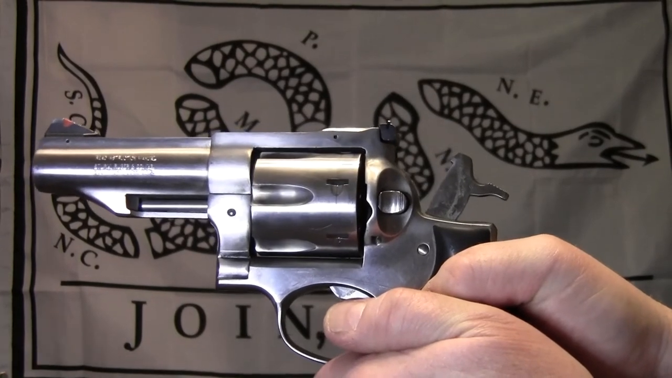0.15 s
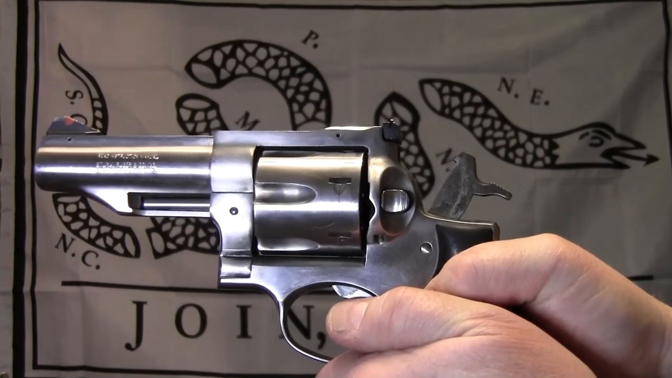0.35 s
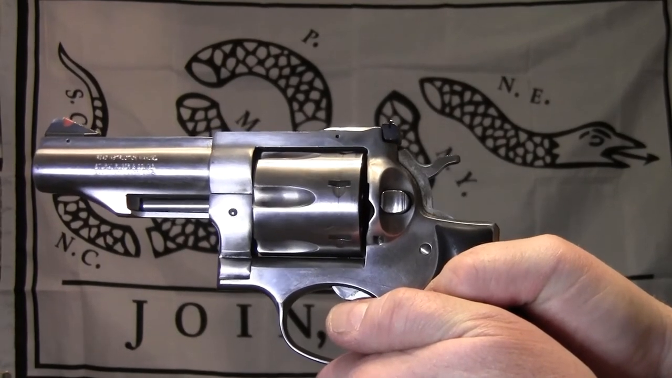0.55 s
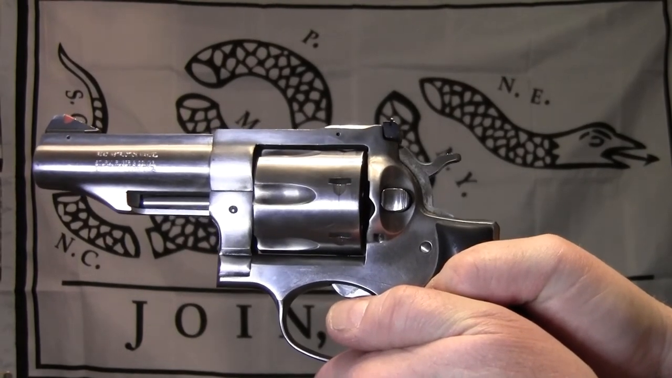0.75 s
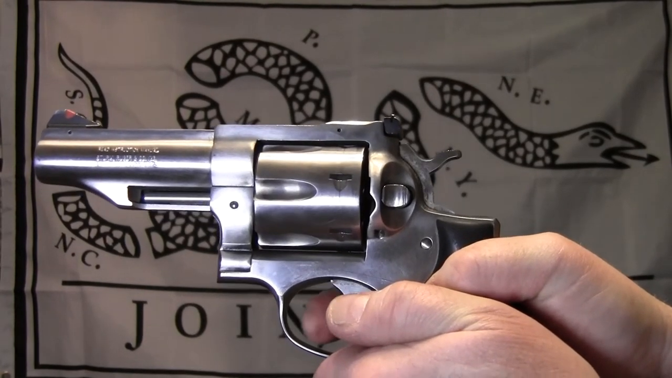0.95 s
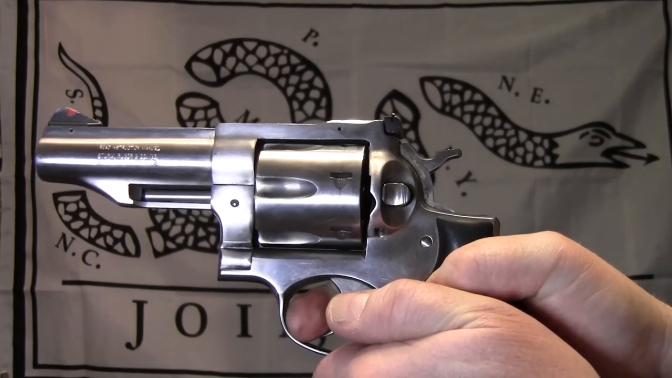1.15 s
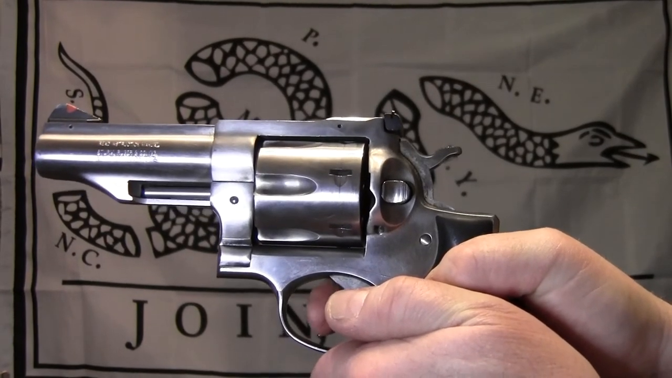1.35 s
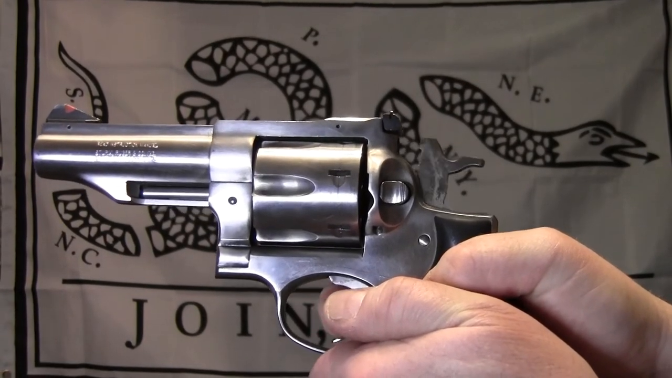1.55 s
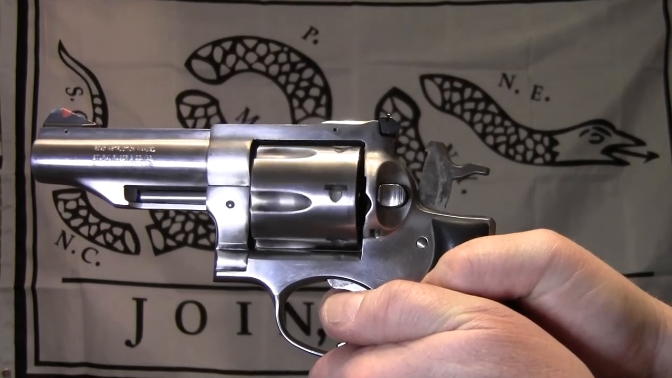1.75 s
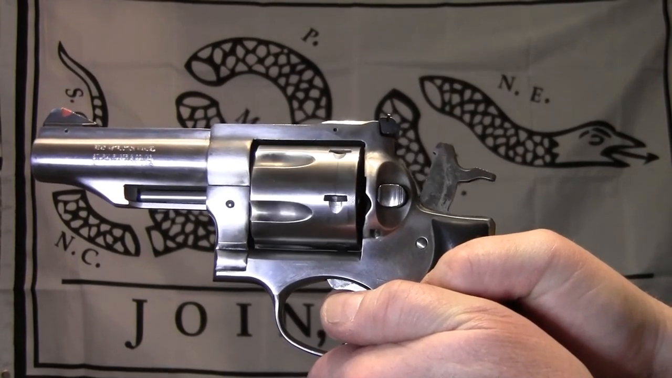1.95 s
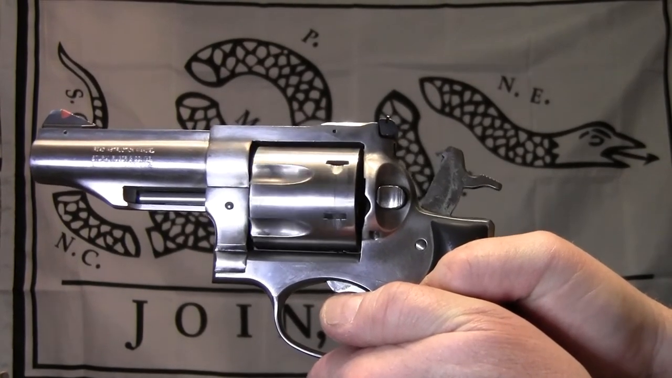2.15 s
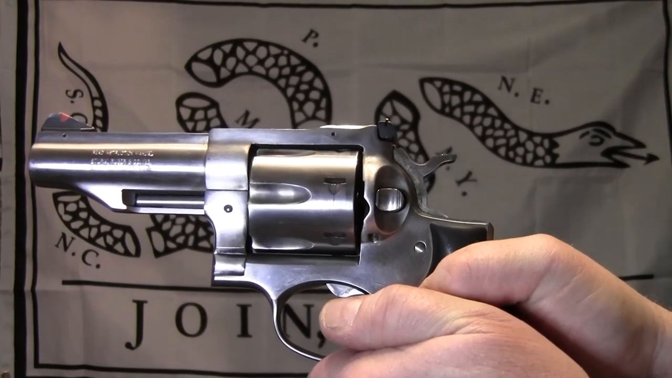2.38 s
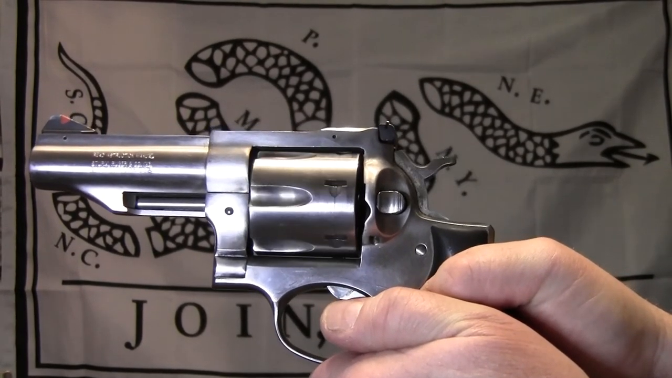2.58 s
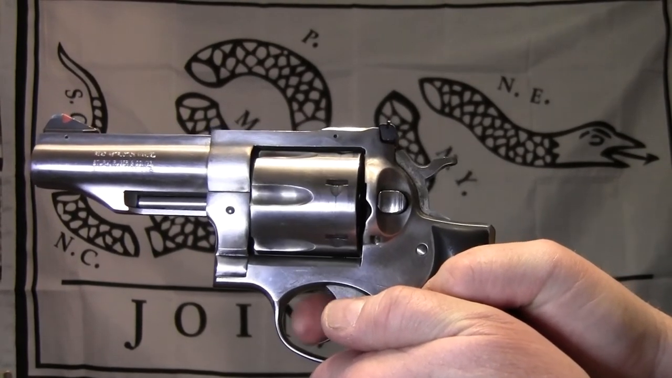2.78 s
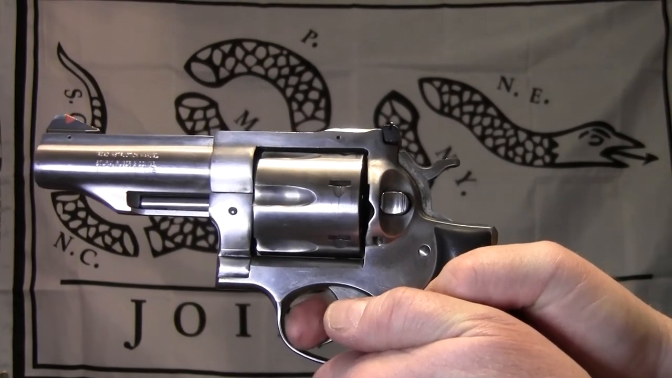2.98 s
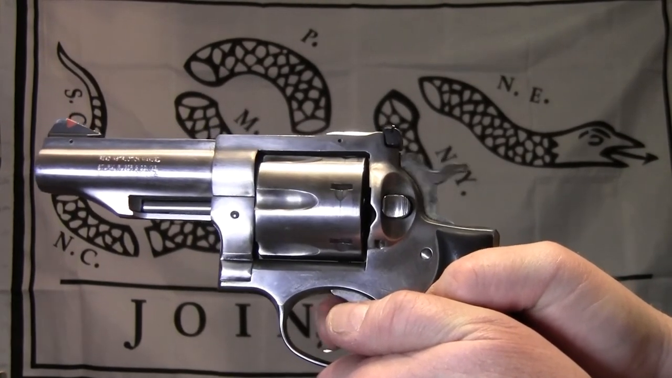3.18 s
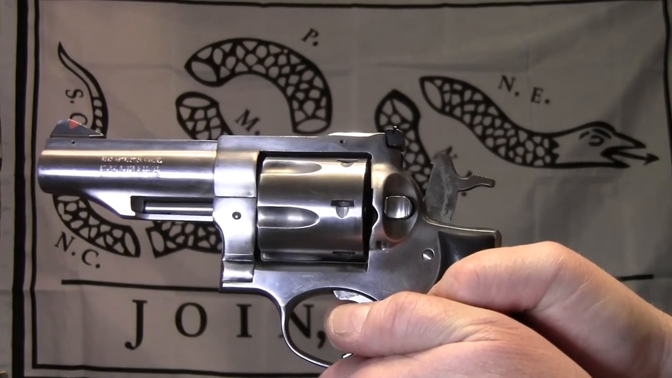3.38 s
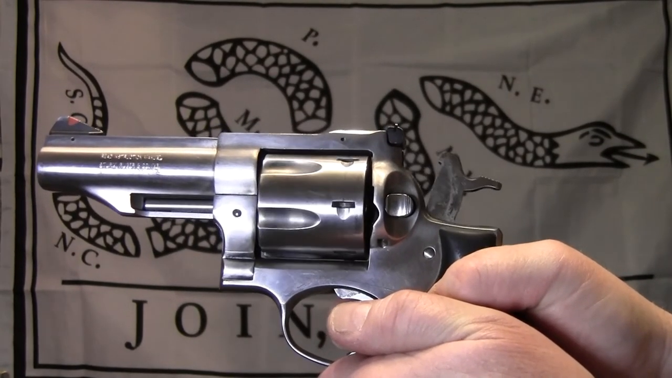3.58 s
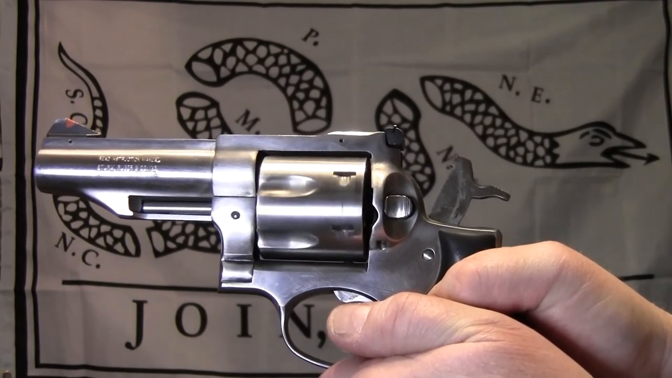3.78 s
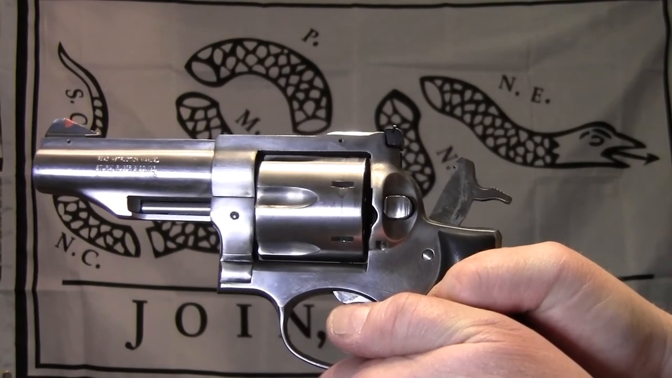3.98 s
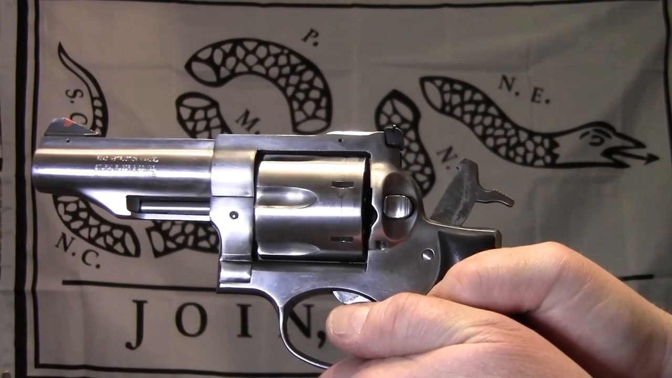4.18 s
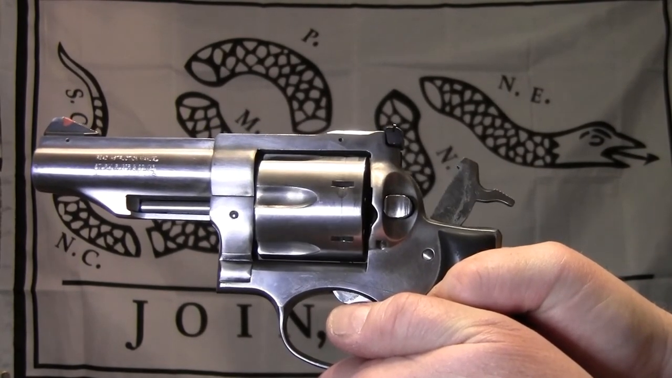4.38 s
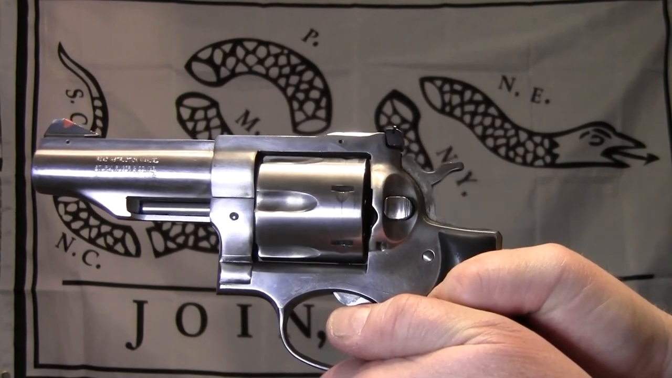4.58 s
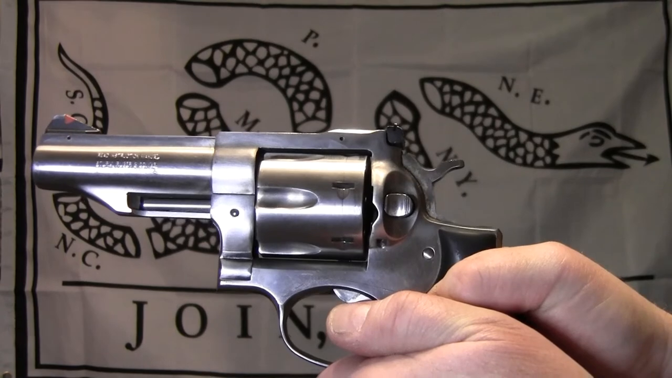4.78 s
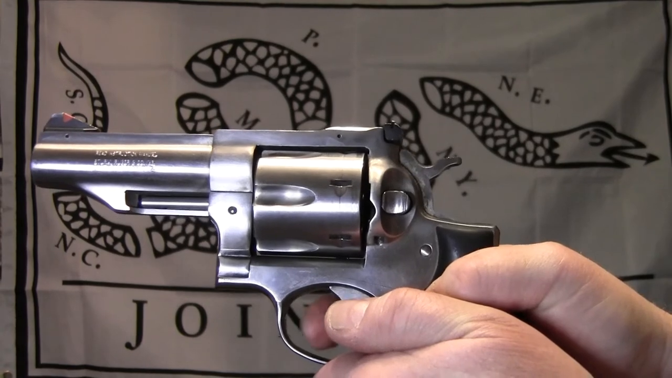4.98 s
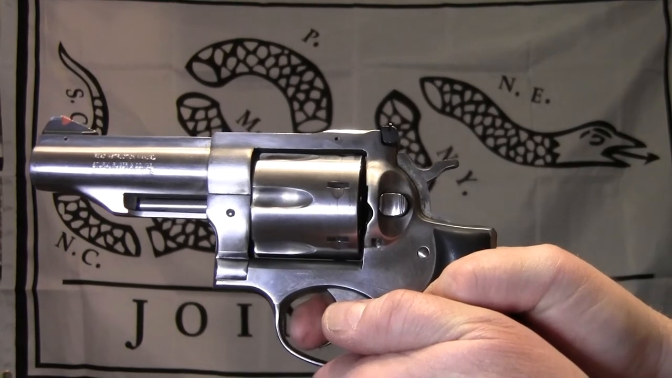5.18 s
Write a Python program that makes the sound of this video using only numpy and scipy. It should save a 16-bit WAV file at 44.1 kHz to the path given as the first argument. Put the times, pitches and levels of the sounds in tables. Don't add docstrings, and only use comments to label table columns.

```python
import sys
import numpy as np
from scipy import signal
from scipy.fft import rfft, irfft
from scipy.io import wavfile

SR = 44100
rng = np.random.default_rng(int(sys.argv[2]) if len(sys.argv) > 2 else 0)


def to_wav(s):
    ch = np.atleast_2d(s).T
    pcm = np.round(np.clip(ch, -1, 1) * 32767)
    wavfile.write(sys.argv[1], SR, pcm.astype(np.int16))


def boost_factor(decibels):
    exponent = np.asarray(decibels, float) / 20
    return 10 ** exponent


N = 230571
HISS_TOP_HZ = 15900

# (time [s], part pitch [Hz], strength [dB], extra low ringing [dB], first touch earlier by [s])
BLOW = [
    (0.538, 5212, 1.5, -1.5, .0037),
    (2.4097, 4532, 2, -3, .0052),
    (4.6274, 6670, 2, 2, .0045),
]


def colour(x, hz, db):
    f = np.maximum(np.fft.rfftfreq(len(x), 1 / SR), 1)
    gain_db = np.interp(np.log(f), np.log(hz), db)
    return irfft(rfft(x) * boost_factor(gain_db), len(x))


def level(x, db):
    return x * boost_factor(db) / np.sqrt(np.mean(x ** 2))


def resonance(hz, width, size):
    b, a = signal.iirpeak(hz, hz / width, SR)
    once = signal.lfilter(b, a, rng.standard_normal(size))
    return signal.lfilter(b, a, once)


def hum():
    # (pitch [Hz], density [dB per Hz])
    air_curve = [(12, -35.5), (20, 8.5), (79, -11.5), (124, -8.5), (230, -19.5), (372, -23), (465, -21.5),
                 (616, -27), (750, -27.5), (1600, -34.5), (13900, -45), (15200, -43), (16500, -61)]
    # (pitch [Hz], width [Hz], level [dB])
    fan_peaks = [(112, 22, -73), (185, 16, -81.5), (273, 42, -76.5), (464.5, 98, -76.5)]
    # (time [s], half length [s], rise above the bed [dB])
    swells = [(.1, 0.074, 14), (.4, .1, 8.7), (1.29, 0.058, 19), (2.08, 0.094, 14), (2.68, 0.1, 11.6),
              (2.98, 0.22, 22), (3.4, 0.2, 5.9), (3.98, 0.073, 16.7), (4.4, .1, 9.5), (4.8, 0.082, 9)]
    rumble_db, duck_db, recover_db_per_s = -73, 5, 2.6
    t = np.arange(N) / SR
    air = level(colour(rng.standard_normal(N), *np.transpose(air_curve)), -58)
    out = colour(air, [HISS_TOP_HZ, 1.02 * HISS_TOP_HZ], [0, -40])
    for hz, width, db in fan_peaks:
        out += level(resonance(hz, width, N), db)

    gain_db = 0
    for s, *_ in BLOW:
        gain_db = gain_db - (t > s) * np.maximum(duck_db - recover_db_per_s * (t - s), 0)

    for s, half_s, db in swells:
        rumble_db = rumble_db + db * np.exp(-((t - s) / half_s) ** 2)
    rumble = level(colour(rng.standard_normal(N), [10, 22, 45, 80, 300], [-23.5, 5, -8, -29.5, -120]), 0)
    return out * boost_factor(gain_db) + rumble * boost_factor(rumble_db)


def add(track, s, y):
    i = int(s * SR)
    track[i:i + len(y)] += y[:N - i]


def ring(modes, contact_s, size=1024):
    t = np.arange(size) / SR
    hz, t60, db = np.transpose(modes)[:, :, None]
    decay = np.exp(-np.log(1000) * t / t60)
    free = np.sum(boost_factor(db) * decay * np.sin(2 * np.pi * hz * t), axis=0)
    contact = rng.standard_normal(size) * t * np.exp(-t / contact_s)
    y = signal.fftconvolve(free, contact)[:size]
    return y / np.abs(y).max()


def push(width_s, size=1024):
    u = np.arange(size) / SR / width_s
    return u * np.exp(1 - u) - 0.04 * (u / 8) * np.exp(1 - u / 8)


def touch(s, hz, colour_db, db):
    return (s, hz, *np.add(colour_db, db))


def contacts(table, contact_s, part_t60, grip_db=0):
    # (pitch [Hz], fall by 60 dB [s], level [dB])
    grip = [(514, 0.0081, -2), (900, 0.0069, 0.5)]
    lows = [(2050, 0.0031, -8.5), (2250, 0.0039, -1), (2730, 0.0027, 3.5)]
    mids = [(4800, 0.0023, -4.5), (5830, 0.0025, 2.5), (6840, 0.0053, -3.5)]
    highs = [(9120, 0.0042, 5.5), (10420, 0.0084, 0), (11400, 0.0064, 7), (12400, 0.006, -3.5),
             (13800, .004, -12.5)]
    out = np.zeros((3, N))
    widths_hz = [1000, 2100, 5000, 7500]
    impulse = np.eye(1, 512, 128)[0]
    for i, (s, hz, *dbs) in enumerate(table):
        spread_db = []
        for k, modes in enumerate((grip, lows, mids + [(hz, part_t60, 0)], highs)):
            b, a = signal.butter(3, 0.8 * modes[0][0], "high", fs=SR)
            y = signal.lfilter(b, a, ring(modes, contact_s))
            y = y * boost_factor(dbs[k] + (grip_db if k == 0 else 1)) / np.abs(y).max()
            add(out[0], s - contact_s, y)
            spread_db.append(10 * np.log10(np.sum(y ** 2) * SR / 2 / widths_hz[k]))
        curve_db = [spread_db[0] - 17, spread_db[0], min(spread_db[:2]), *spread_db[1:], spread_db[3] - 11.5]
        bare = colour(impulse, [200, 800, 1400, 2400, hz, 11500, 16500], curve_db)
        add(out[1 + i % 2], s - 128 / SR, bare)
    return out


def afterring(track, rows, modes, mode_dbs):
    t = np.arange(SR // 2) / SR
    swell = 1 - np.exp(-(t / 0.003) ** 2)
    for s, hz, *dbs in rows:
        for (centre, width, t60), db in zip(modes, mode_dbs):
            band_db = dbs[np.searchsorted([1400, 3500, 8500], centre)]
            noise = level(resonance(centre, width, len(t)), band_db + db)
            add(track, s, swell * np.exp(-np.log(1000) * t / t60) * noise)


def hammer():
    # (knock [dB], lows [dB], part [dB], highs [dB])
    slip_db = (-40.5, -45.5, -51.5, -57)
    touch_db = (-29, -21, -20.5, -21)
    blow_db = (-14, -14.5, -9.5, -7.5)
    # (pitch [Hz], width [Hz], fall by 60 dB [s])
    barrel = [(2730, 550, 0.22), (6050, 1200, 0.2), (8940, 130, 0.23), (9220, 660, 0.19),
              (12060, 1100, 0.13)]
    barrel_db = [-25, -25.5, -23.5, -18.5, -16]
    falls = []
    for s, hz, db, lows_db, lead_s in BLOW:
        falls.append(touch(s - 0.0082, 5200, slip_db, db))
        falls.append(touch(s - lead_s, 5300, touch_db, db))
        falls.append(touch(s, hz, blow_db, db + np.array([0, lows_db, 0, 0])))
    blows = falls[2::3]
    out = contacts(falls, contact_s=0.0007, part_t60=0.005, grip_db=-5)
    for s, hz, knock_db, *_ in blows:
        add(out[0], s, boost_factor(knock_db - 1.5) * push(0.0003))
    afterring(out[0], blows, barrel, barrel_db)
    return out


def slaps(x):
    # (delay [s], level [dB])
    surfaces = [
        (.0075, -14),
        (0.013, -15),
    ]
    out = sum(boost_factor(db) * np.roll(x, int(s * SR)) for s, db in surfaces)
    return colour(out, [150, 1000, 2500], [-14, -8, 0])


def walls(x):
    # (middle of the band [Hz], fall by 60 dB [s])
    bands = [(250, .09), (500, 0.058), (1000, 0.13), (2000, 0.13), (4000, 0.12), (8000, .125),
             (14000, 0.11)]
    band_dbs = [-40, -42, -43, -39.5, -40.5, -36, -28]
    gap_s, rise_s = 0.0035, 0.0025
    late_db, late_stretch = -13, 1.6
    t = np.arange(SR // 2) / SR
    uneven_db = 2.5 * rng.standard_normal(len(t) // 32 + 1).repeat(32)[:len(t)]
    echoes = rng.standard_normal(len(t)) * boost_factor(uneven_db)
    echoes = colour(echoes, [HISS_TOP_HZ, 1.02 * HISS_TOP_HZ], [0, -30])
    build = 1 - np.exp(-np.maximum(t - gap_s, 0) / rise_s)
    tail = 0
    for (hz, t60), db in zip(bands, band_dbs):
        octave = colour(echoes, [hz / 4, hz / 2, hz, hz * 2, hz * 4], [-40, -14, 0, -14, -40])
        decay = boost_factor(-60 * t / t60) + boost_factor(late_db - 60 * t / t60 / late_stretch)
        tail = tail + boost_factor(db) * octave * decay
    return signal.fftconvolve(x, tail * build)[:N]


def ticks():
    # (time [s], length [s], strength [dB])
    rides = [
        (0.902, 0.021, -4),
        (2.7987, 0.008, -1),
        (5.01, .0136, -1),
    ]
    # (share of the length, part pitch [Hz], colour of knock, lows, part, highs [dB])
    ride_steps = [
        (0, 5400, (-65, -54, -53, -61)),
        (.365, 6060, (-56, -42, -39.5, -41.5)),
        (0.639, 5300, (-58, -51, -42, -46)),
        (1, 6440, (-49, -52, -31.5, -43.5)),
    ]
    # (time [s], part
    # pitch [Hz], peak [dB], sharpness of the edge [dB], body [dB])
    clicks = [(0.8812, 5280, -56, 0.5, -6), (0.8848, 5270, -54.5, 2.5, -4), (0.9537, 5270, -39, 7, 1.5),
              (0.9548, 4840, -43.5, -5, -2.5), (1.3601, 5550, -65, 7, 2), (1.4722, 4290, -59, 3, 3),
              (1.5132, 5200, -70, -3, 9), (1.5255, 5060, -71, -3, 9), (1.5316, 5000, -56, -0.5, -3),
              (1.6372, 4750, -60, -9, 0), (2.3764, 4410, -60.5, -2.5, 2), (2.3832, 6650, -61, 0.5, 1.5),
              (2.7798, 5700, -55.5, 5, 0), (2.8213, 6170, -38.5, 7.5, 0), (3.1228, 4580, -60, 10, -7),
              (3.219, 6680, -58.5, 3, -3.5), (3.2241, 5250, -55.5, 7, 2.5), (3.2517, 6590, -57.5, 10, 6),
              (3.2526, 4890, -51, 5.5, -3), (3.3128, 5060, -62.5, -6, -1), (3.679, 7400, -69.5, 7, 1),
              (4.145, 5900, -67, 1, 6.5), (4.9894, 5510, -56, 7.5, -3.5), (5.0356, 6350, -40, 11.5, -0.5)]
    # (knock [dB], lows [dB], part [dB], highs [dB])
    slip_db = (-9.5, -1.5, 5.5, -6.5)
    rows = []
    for s, length_s, db in rides:
        for share, hz, colour_db in ride_steps:
            rows.append(touch(s + share * length_s, hz, colour_db, db))
    for s, hz, db, edge_db, body_db in clicks:
        rows.append(touch(s, hz, slip_db, db + np.array([body_db, body_db, 0, edge_db])))
    return rows


def rubbing(track):
    # (start [s], end [s], pitch [Hz], level [dB])
    rubs = [
        (.903, 0.922, 4380, -54),
        (1.46, 1.542, 3460, -82),
        (2.795, 2.827, 4535, -57.5),
        (3.21, 3.267, 4000, -71),
        (4.68, 4.987, 780, -71.5),
        (5.008, 5.042, 4800, -56.5),
    ]
    for start, end, hz, db in rubs:
        size = int((end - start) * SR)
        grain_db = 2 * rng.standard_normal(size // 40 + 1).repeat(40)[:size]
        grains = rng.standard_normal(size) * boost_factor(grain_db)
        rub = colour(grains, [hz / 5, hz / 2, hz, 5.7 * hz, 6 * hz], [-41, 5.5, 2, -14, -28])
        add(track, start, level(rub, db) * np.hanning(size) ** 0.5)


def latches(table, kind):
    strike_db, bounce_db, bounce_s, bounce_hz = kind
    rows = []
    for s, hz, db, lows_db in table:
        strength_db = db + np.array([0, lows_db, 0, 0])
        rows.append(touch(s, hz, strike_db, strength_db))
        rows.append(touch(s + bounce_s, bounce_hz, bounce_db, strength_db))
    return rows


def grip_knock(track):
    # (time [s], peak [dB])
    knocks = [
        (4.7172, -34),
    ]
    # (pitch [Hz], fall by 60 dB [s], level [dB])
    tones = [(72.6, 0.14, 0.5), (300, 0.024, 2.5), (633, 0.023, -4), (1080, 0.018, 14)]
    for s, db in knocks:
        add(track, s, -boost_factor(db) * push(0.00025))
        add(track, s, boost_factor(db + 0.5) * ring(tones, 0.0002, size=4096))


def lockwork():
    # (time [s], part pitch [Hz], strength [dB], extra low ringing [dB])
    trigger_resets = [
        (1.0738, 6700, 0.5, -1),
        (2.8438, 5100, 1, -2),
        (5.0639, 4933, -1, 3),
    ]
    cylinder_locks = [
        (1.8589, 6020, 0.11, .5),
        (3.4856, 6530, -1.25, -1.5),
    ]
    # (strike colour [dB], bounce colour [dB], bounce after [s], bounce pitch [Hz])
    reset_kind = (-37, -28.5, -24, -30), (-46.5, -28.5, -25.5, -26.5), 0.0027, 4600
    lock_kind = (-46, -37.5, -20.5, -30.5), (-67, -40.5, -32.5, -33.5), 0.0027, 4960
    # (pitch [Hz], width [Hz], fall by 60 dB [s])
    guard = [(2330, 690, 0.13), (7740, 940, 0.25), (10000, 150, 0.14)]
    cylinder = [(5560, 560, 0.19), (7600, 900, .14), (12300, 1500, 0.13)]
    guard_db = [-17, -31, -21]
    cylinder_db = [-26, -29, -18]
    resets = latches(trigger_resets, reset_kind)
    locks = latches(cylinder_locks, lock_kind)
    out = contacts(ticks(), contact_s=0.0003, part_t60=0.0035)
    out += contacts(resets + locks, contact_s=0.0005, part_t60=0.006, grip_db=2)
    rubbing(out[0])
    afterring(out[0], resets[1::2], guard, guard_db)
    afterring(out[0], locks[1::2], cylinder, cylinder_db)
    grip_knock(out[0])
    return out


def scene():
    snap, small = hammer(), lockwork()
    spread = boost_factor(8) * snap + small
    mid = hum() + snap[0] + small[0]
    mid += slaps(snap[0] + 0.5 * small[0])
    mid += walls(spread[1] + 0.14 * small[0]) + walls(spread[2])
    side = boost_factor(-43.5) * colour(np.roll(mid, 23), [60, 700, 3000, 12000], [-3, 7, 3, 0])
    port_hiss = colour(rng.standard_normal(N), [100, 1000, 14000, 16000], [6, 0.5, -2, -30.5])
    side += level(port_hiss, -91.5)
    return np.array([mid + side, mid - side])


def band_limit(x):
    return signal.sosfilt(signal.butter(12, 16950, fs=SR, output="sos"), x)


def record(dry):
    rounded = np.tanh(0.6 * dry) / 0.6
    top_cut = signal.ellip(10, 0.5, 80, 16800, fs=SR, output="sos")
    mix = signal.sosfilt(top_cut, rounded)
    return band_limit(mix)


dry = scene()
out = record(dry)
to_wav(out)
```